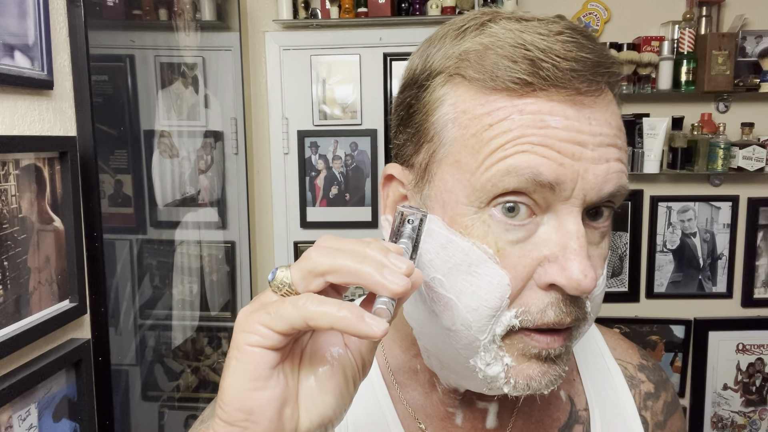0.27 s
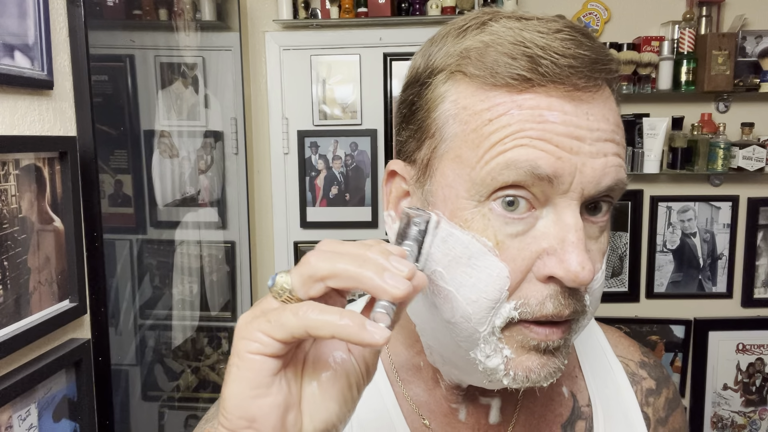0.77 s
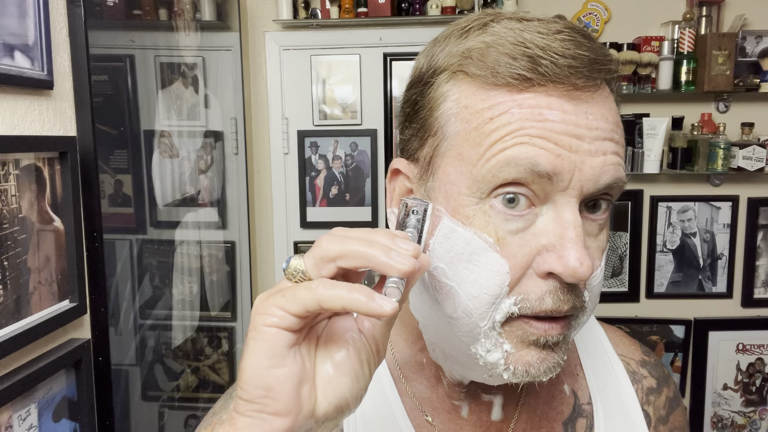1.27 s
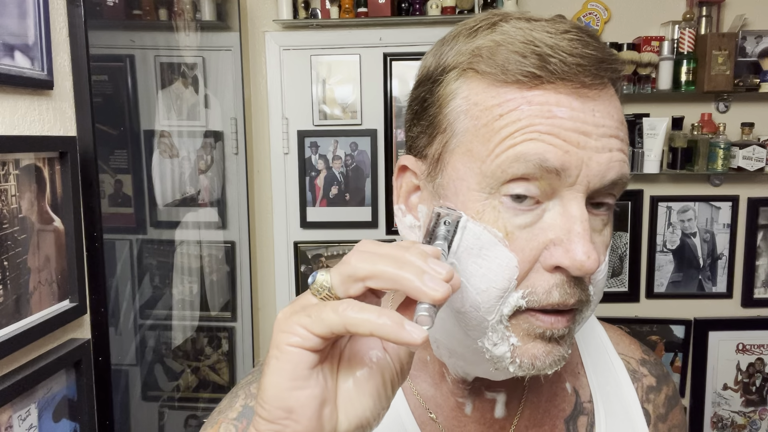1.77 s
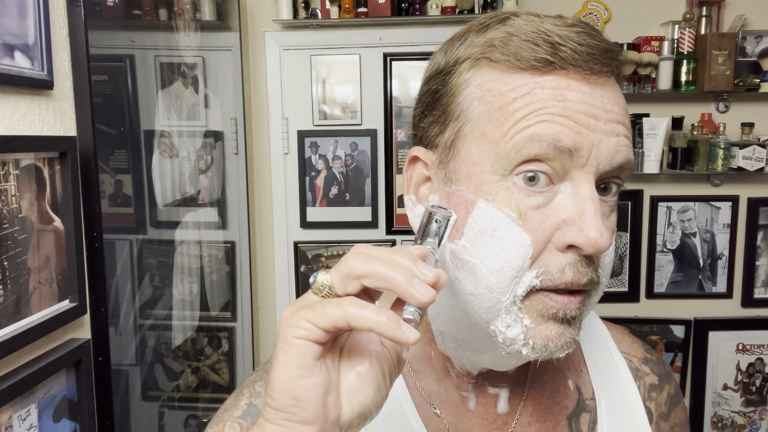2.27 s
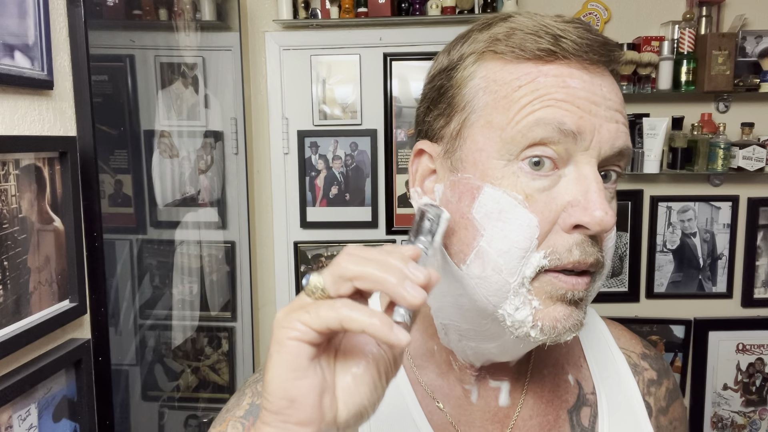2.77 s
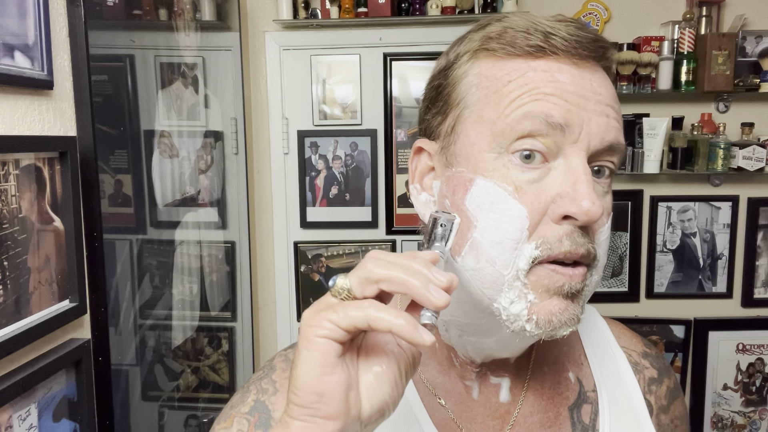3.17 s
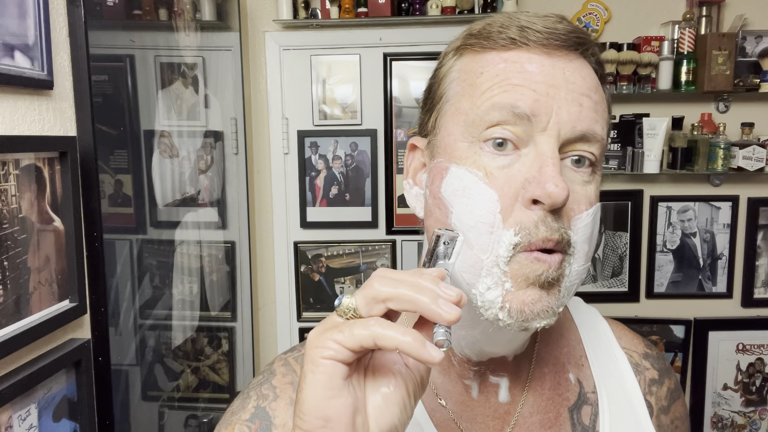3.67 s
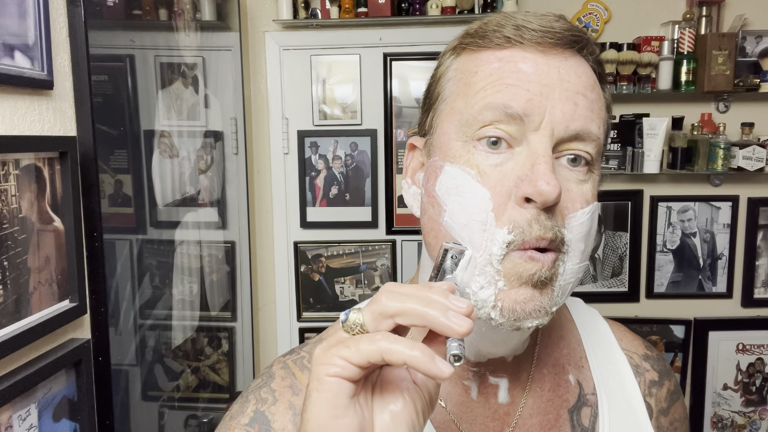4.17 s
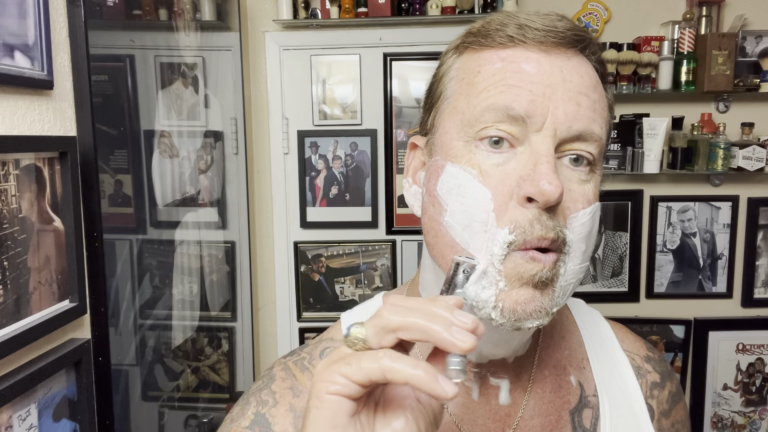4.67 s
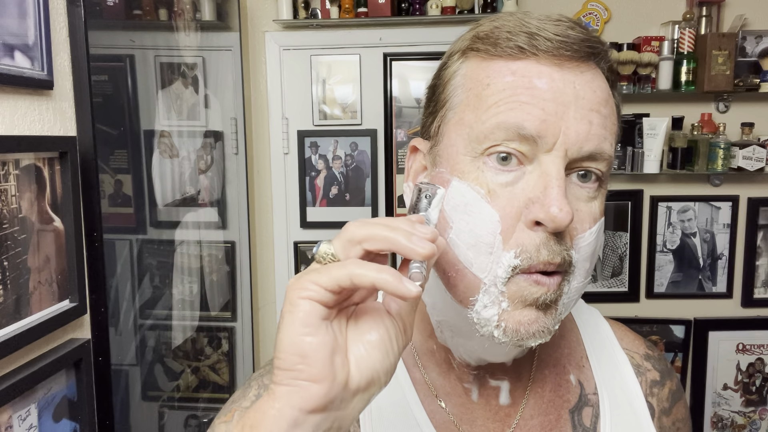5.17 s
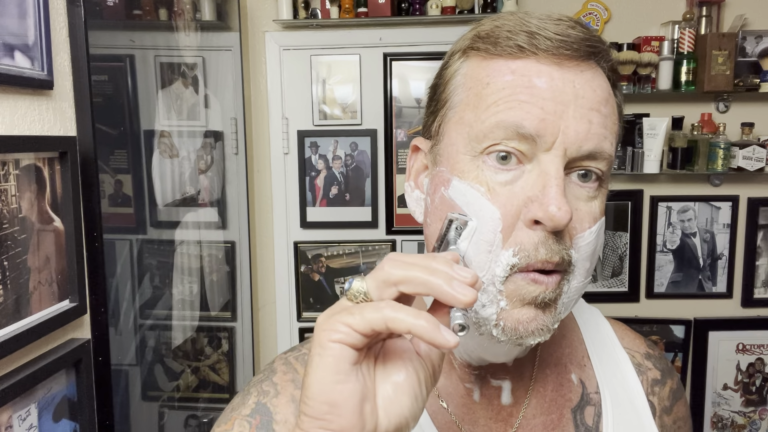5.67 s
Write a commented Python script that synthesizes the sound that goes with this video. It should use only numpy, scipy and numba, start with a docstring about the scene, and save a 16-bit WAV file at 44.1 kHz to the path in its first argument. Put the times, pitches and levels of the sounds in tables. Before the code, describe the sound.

A safety razor shaves lathered stubble, close to a phone in a small, fairly dry room. The rasp is a fine crowd of bright metallic clicks, broken by sharper irregular whisker snaps. The first stroke, 0.2 to 0.7 s, starts lightly and crackles harder at its end. The second, 1.25 to 1.85 s, is similar, with very faint squeaks and a soft rub after it. The third, 2.05 to 2.7 s, builds to a firm scrape and ends with a dull little knock. The fourth, 3.0 to 4.7 s, is longest and strongest, its tone sinking from crisp to hollower and lower. After a gap, a lighter, duller stroke runs 5.13 to 5.9 s. Between strokes only the background remains: a low throbbing fan motor, mains hum and bassy air rumble, strongest at first, when a faint low drone glides and fades by about 1.6 s.

```python
"""Five crisp, rasping strokes of a safety razor down a lathered cheek, heard close to a phone in a small room.
The rasp is a crowd of tiny clicks, one per cut whisker, ringing the blade and then the cheek.
It deepens towards the mouth as the lowest cheek resonance falls; rubs, squeaks and knocks are filtered noise and tones.
Underneath lie a throbbing fan motor and mains hum made of sines, a rumble of shaped noise,
and, at first, a faint drone of gliding low tones."""
import sys
import numpy as np
from scipy import signal
from scipy.fft import rfft, irfft
from scipy.io import wavfile
from scipy.ndimage import uniform_filter1d
from numba import njit

SR = 44100
rng = np.random.default_rng(int(sys.argv[2]) if len(sys.argv) > 2 else 0)


def generate_wav(sig):
    """Save sig (samples, or channels by samples) to the path in sys.argv[1] as 16-bit PCM at SR."""
    pcm = np.round(np.clip(np.atleast_2d(sig).T, -1, 1) * 32767).astype(np.int16)
    wavfile.write(sys.argv[1], SR, pcm)


N = 261072
TIME = np.arange(N) / SR
FREQ = np.fft.rfftfreq(N, 1 / SR)

# Levels in the tables are those of the source, ahead of any trim, swell or room in the functions.

# The strokes of the razor. Each row: touch in seconds, start of the lift in seconds,
# time to settle on the skin in seconds, level at the start in dB, level at the end in dB.
STROKES = [(0.16, 0.728, 0.19, -68.5, -71), (1.247, 1.84, 0.041, -71, -70),
           (2.043, 2.686, 0.21, -67.5, -56.5), (3.002, 4.711, 0.035, -54.5, -62.5),
           (5.127, 5.92, 0.038, -66, -63.5)]
# The hand pushes or eases within a stroke. Each row: middle in seconds, length in seconds, change of level in dB.
PUSHES = [(0.557, 0.066, 7), (0.714, 0.12, 17), (1.393, 0.039, 6), (1.48, 0.056, 2), (1.6, 0.13, 11),
          (2.313, 0.093, 6.5), (2.482, 0.12, 7.5), (2.595, 0.097, 12), (3.129, 0.091, 7.5),
          (3.519, 0.3, 8.5), (3.768, 0.027, -6), (4.022, 0.2, 3), (4.182, 0.022, -9), (4.404, 0.064, 5),
          (4.631, 0.13, 6.5), (5.256, 0.067, 6.5)]
# The coarsest whiskers. Each row: time of the snap in seconds, level in dB.
SNAPS = [(0.278, -51.5), (0.3403, -41.5), (.391, -44), (.396, -45.5), (.406, -56), (.490, -53),
         (0.5103, -46), (.519, -50), (.527, -45.5), (0.549, -54), (0.588, -51), (.605, -47), (.615, -55),
         (0.626, -43.5), (0.636, -44.5), (0.6691, -40), (.699, -47), (0.7154, -35.5), (1.298, -54),
         (1.333, -46), (1.3615, -44), (1.385, -51), (1.399, -49), (1.416, -43), (1.4288, -44.5),
         (1.5194, -45), (1.533, -48.5), (1.5618, -39), (1.571, -46), (1.612, -49), (1.619, -46.5),
         (1.646, -52), (1.6671, -40), (1.6852, -39.5), (1.724, -45.5), (1.7693, -41), (1.811, -53),
         (1.837, -55), (1.883, -67), (2.174, -68), (2.202, -68), (2.217, -53), (2.245, -48.5), (2.258, -60),
         (2.272, -52), (2.318, -41.5), (2.328, -38.5), (2.369, -39.5), (2.384, -47), (2.4204, -39),
         (2.443, -44), (2.468, -37.5), (2.48, -36.5), (2.491, -40), (2.509, -39), (2.546, -38.5),
         (2.565, -36.5), (2.578, -39), (2.63, -35.5), (2.6816, -44.5), (3.0412, -48), (3.049, -44),
         (3.078, -45), (3.122, -39), (3.151, -38.5), (3.1843, -37), (3.2105, -46), (3.258, -36),
         (3.3252, -39), (3.338, -37), (3.435, -39), (3.462, -37), (3.471, -36), (3.512, -38.5),
         (3.627, -37.5), (3.6515, -39), (3.682, -39), (3.713, -37.5), (3.73, -44), (3.757, -45),
         (3.783, -37), (3.796, -39), (3.808, -45), (3.8301, -37), (3.922, -35), (3.955, -38.5),
         (4.019, -39.5), (4.0416, -38), (4.095, -44.5), (4.111, -43.5), (4.153, -46.5), (4.193, -41),
         (4.213, -50), (4.2477, -39), (4.295, -43.5), (4.3208, -40), (4.376, -46), (4.4069, -46),
         (4.481, -46), (4.528, -44), (4.556, -50), (4.6108, -43), (4.624, -42), (4.693, -38), (5.041, -63),
         (5.155, -56), (5.174, -53), (5.182, -48), (5.232, -44), (5.3, -49), (5.344, -52.5), (5.372, -47.5),
         (5.401, -48), (5.4293, -50.5), (5.438, -46.5), (5.459, -49.5), (5.479, -45), (5.51, -42.5),
         (5.543, -48), (5.592, -45.5), (5.604, -46), (5.642, -45.5), (5.668, -48), (5.693, -49.5),
         (5.713, -48.5), (5.764, -49.5), (5.784, -48), (5.821, -49.5), (5.848, -50.5), (5.855, -46.5),
         (5.89, -56)]
# Ring of the razor head. Each row: frequency in Hz, relative level in dB.
BLADE = [(900, -23.5), (1600, -7.5), (2300, -4), (2950, -9.5), (3500, -6), (3950, -8), (4450, -6.5),
         (5100, -5.5), (5900, -3.5), (7000, 1), (8800, 5), (10500, 6), (12200, -1.5), (14000, -0.5),
         (15500, -7.5)]
# The cheek under the blade, from temple towards mouth. Each row: time in seconds, lowest resonance in Hz,
# strength of that resonance in dB.
CHEEK = [(.3, 5380, -8.5), (1.3, 5310, -6), (2.25, 4450, -9.5), (2.6, 3830, -7.5), (3.1, 3750, -5),
         (3.55, 3480, 3), (3.8, 3260, 2.5), (4.0, 3080, 5), (4.12, 2460, -2.5), (4.7, 2300, -8),
         (5.17, 2300, -20), (5.3, 2070, -9), (5.9, 1980, -2)]
# Upper resonances of the cheek. Each row: frequency in Hz, width in Hz, relative level in dB.
UPPER = [(4250, 310, 3), (5300, 520, -2.5), (5870, 510, 3)]
# Soft rubs and squishes of skin and lather. Each row: start in seconds, end in seconds, frequency in Hz,
# width in Hz, level in dB.
RUBS = [(1.78, 1.924, 394.6, 75, -64), (1.794, 1.888, 650, 200, -86.5), (1.952, 2.024, 365, 60, -65.5),
        (2.302, 2.673, 1660, 1210, -84.5), (2.525, 2.626, 352, 90, -67), (1.428, 1.475, 1090, 200, -77),
        (3.88, 4.04, 600, 500, -82)]
# Faint squeaks. Each row: start in seconds, end in seconds, first pitch in Hz, last pitch in Hz, level in dB.
SQUEAKS = [(1.374, 1.461, 1510, 1602, -82.5), (1.426, 1.51, 1200, 1180, -79),
           (1.473, 1.52, 1630, 1520, -85.5), (2.882, 2.95, 3700, 3700, -84)]
# Dull knocks of the razor in the hand. Each row: time in seconds, frequency in Hz, width in Hz,
# decay in seconds, level in dB.
KNOCKS = [(2.68, 600, 1100, 0.025, -69), (3.837, 720, 1090, 0.021, -66), (5.461, 700, 1000, 0.031, -72)]
# The razor at the two ports. Each row: frequency in Hz, lead of the left in ms, left minus right in dB,
# scattered sound in dB.
PORTS = [(450, 0.043, -10.5, -4.5), (1000, 0.047, -0.5, 9), (2440, 0.18, -2.5, 5.5),
         (3500, 0.0014, -2.5, 9.5), (4550, 0.2, -9.5, 2.5), (5830, 0.2, -4.5, 2.5),
         (8250, 0.1848, -3, -1.5), (11300, 0.17, 0.5, 5.5), (12600, 0.175, 2.5, 4.5),
         (13100, 0.162, -1.5, -11.5)]
# Fan motor lines. Each row: frequency in Hz, level in dB.
HUM = [(46.7, -61.5), (55.9, -57), (65.2, -59), (111.8, -64.5), (167.7, -66), (223.6, -86), (335.4, -79.5),
       (383, -80.5), (466, -100.5)]
# The fan hum swells and sinks. Each row: time in seconds, change of level in dB.
HUM_SWELL = [(0, 3), (1.2, 3.5), (2.2, 2.5), (2.9, 1.5), (3.25, -3.5), (3.6, 3), (4.3, 4), (4.8, -0.5),
             (5.3, 2.5), (5.9, 2.5)]
# Tones of the faint drone. Each row: start in seconds, end in seconds, first pitch in Hz, last pitch in Hz,
# level in dB.
DRONE = [(-1.37, 0.37, 124.5, 110, -49), (.33, 0.803, 118, 93, -53.5), (0.706, 1.21, 119, 113, -55.5),
         (1.12, 1.6, 121, 116, -59.5), (-0.054, 0.375, 280, 210, -61.5), (.4, 0.734, 150, 231, -62.5),
         (.12, .45, 120, 200, -63), (0.313, 0.67, 160, 180, -66), (0.78, 1.5, 220, 150, -64.5)]
# Moving air in the room. Each row: frequency in Hz, level in dB per Hz.
AIR = [(20, -92), (30, -82), (38, -77.5), (75, -75), (95, -74), (112, -73.5), (140, -77), (200, -77.5),
       (255, -84.5), (290, -88.5), (385, -88.5), (440, -99), (1000, -109), (4000, -121), (8000, -126),
       (11000, -121.5), (15000, -134)]
# Likeness of the air at the two ports. Each row: frequency in Hz, correlation from -1 to 1.
AIR_LIKENESS = [(60, 0.72), (130, 0.96), (220, 0.48), (400, -0.75), (1000, -0.5)]
# Balance of the air. Each row: frequency in Hz, left minus right in dB.
AIR_BALANCE = [(200, 0), (380, -5.5), (1000, -0.5), (4400, -2), (11000, 0)]

TOUCH_DB, LIFT_DB_PER_S = -31.5, 447  # first touch against the settled stroke; fade as the blade lifts
SNAG_DB, SNAG_S = -4.5, 0.0076  # the rasp stalls by this much, for about this long, before a coarse whisker gives
FIRM_HZ, SOFT_HZ = 3530, 2420  # lowest resonance of the cheek over bone and where it is slack
CHEEK_DAMPING = .2
FIRM_SPLINTER, SLACK_SPLINTER = .45, .75  # share of a snap's energy in splinters, over bone and on slack skin
SPLINTER_S = .0015  # decay of the splinters
MAINS_HZ, MAINS_DB, MAINS_OCTAVE_DB = 120, -61, -16.5  # hum, its level, and its octave against that level
RUMBLE_DB, GUST_DB, GUST_S = -3, 3, 0.42  # settled rumble trim; extra at the start; time constant of its fading
TOP_HZ = 15600


def razor(level_db):
    """Whisker clicks, thinned while the blade snags, ring the razor head and then the cheek."""
    held_db = level_db + snag()
    clicks = ring(stubble(held_db) + snaps(held_db), BLADE)
    return cheek(clicks)


def cheek(clicks, order=4, edge_damping=1.0, skirt=0.79, wander=0.05, wander_hz=45, leak_db=-18,
          firm_upper_db=-14, soft_upper_db=3.0):
    """The cheek adds resonances and radiates mainly above the lowest, which shifts as skin stretches and slips."""
    edge_hz, peak_db = curve(CHEEK, axis=1), curve(CHEEK, axis=2)
    upper_db = np.interp(edge_hz, [SOFT_HZ, FIRM_HZ], [soft_upper_db, firm_upper_db])
    radiated = clicks
    for _ in range(order):
        _, radiated = svf(radiated, skirt * edge_hz, edge_damping)
    moving_hz = edge_hz * np.exp(wander * walk(wander_hz))
    lowest, _ = svf(radiated, moving_hz, CHEEK_DAMPING)
    upper = np.zeros(N)
    for hz, width, db in UPPER:
        band, _ = svf(radiated, np.full(N, float(hz)), width / hz)
        upper += undb(db) * band
    sound = radiated + undb(peak_db) * lowest + undb(upper_db) * upper + undb(leak_db) * clicks
    return dull(sound, edge_hz, peak_db)


def dull(sound, edge_hz, peak_db, split_hz=7600, firm_bright_db=-0.9, soft_bright_db=-8.0, dulling=0.27):
    """Soft or strongly ringing skin tilts the balance from the treble to the body of the sound."""
    bright_db = np.interp(edge_hz, [SOFT_HZ, FIRM_HZ], [soft_bright_db, firm_bright_db]) - dulling * peak_db
    body = irfft(rfft(sound) / (1 + (FREQ / split_hz) ** 10), N)
    treble = sound - body
    return body * undb(-bright_db / 2) + treble * undb(bright_db / 2)


def pressure():
    """Level of the rasp in dB: each stroke settles, ramps and lifts off; the hand pushes or eases within it."""
    strokes = []
    for start, end, settle, first_db, last_db in STROKES:
        ramp = np.interp(TIME, [start, end], [first_db, last_db])
        landing = np.minimum((TIME - start) / settle - 1, 0) * -TOUCH_DB
        lifting = np.maximum(TIME - end, 0) * LIFT_DB_PER_S
        strokes.append(ramp + landing - lifting)
    pushes = sum(db * np.exp(-(2 * (TIME - s) / length) ** 2) for s, length, db in PUSHES)
    return np.max(strokes, axis=0) + pushes


def stubble(level_db, rate=2100, rate_db=-55, crowding=0.45, spread_db=10.0, catch_db=4.0, catch_hz=200,
            lather_db=-11):
    """Clicks of cut hairs, denser in a firm stroke and bunched as the blade catches, over a fine hiss of lather."""
    # rate is in hairs per second at a level of rate_db
    density = np.clip(rate / SR * undb(crowding * (level_db - rate_db)), .015, 1)
    cut = (rng.random(N) < density) / np.sqrt(density)
    size = unit(undb(spread_db * np.clip(rng.standard_normal(N), -2, 2)))
    hairs = cut * size * rng.choice([-1, 1], N)
    lather = undb(lather_db) * rng.standard_normal(N)
    return catching(catch_hz, catch_db) * (hairs + lather) * undb(level_db)


def catching(rate_hz, depth_db, even_s=0.043):
    """The blade catches and slips in quick jolts; the steady hand keeps their average force even."""
    jolts = undb(depth_db * np.clip(walk(rate_hz), -2, 2))
    return jolts / np.sqrt(uniform_filter1d(jolts ** 2, int(even_s * SR)))


def snaps(level_db, coarse_db=2.0, contact_s=0.00043):
    """A whisker parts with one sharp click and a few splinters, which take more energy where the skin is slack."""
    out, t = np.zeros(N + SR), TIME[:SR // 100]
    crackle = rng.standard_normal(N + SR) * (rng.random(N + SR) < .3)
    share = np.interp(curve(CHEEK, axis=1), [SOFT_HZ, FIRM_HZ], [SLACK_SPLINTER, FIRM_SPLINTER])
    coarse = [(s, db + coarse_db) for s, db in SNAPS]
    for s, db in coarse + lesser_snaps(level_db):
        start = int(s * SR)
        splinters = unit(crackle[start:start + len(t)] * np.exp(-t / SPLINTER_S))
        burst = splinters * np.sqrt(share[start] / len(t))
        burst[0] = np.sqrt(1 - share[start])  # the sharp click
        out[start:start + len(t)] += burst * undb(db) * np.sqrt(contact_s * SR)
    return out[:N]


def lesser_snaps(level_db, count=560, typical_db=-55.0, at_db=-60, follow=1.0, spread_db=6.0, contact_db=-68,
                 fade=0.17):
    """Times and levels of middling whiskers, met at random: louder under pressure, fading where the blade lightens."""
    chance = rng.random((count, 2))
    at = ((np.arange(count) + chance[:, 0]) / count * N).astype(int)
    light = fade * np.minimum(level_db[at] - contact_db, 0)  # extra fall where the blade barely touches
    db = typical_db + follow * (level_db[at] - at_db) + light
    return list(zip(TIME[at], db + spread_db * (2 * chance[:, 1] - 1)))


def snag():
    """Dip of the rasp in dB, deepening while each coarse whisker holds the blade up, until it gives."""
    gives = np.zeros(N)
    gives[[int(s * SR) for s, _ in SNAPS]] = 1
    # a decay run backwards in time grows towards each snap
    held = signal.lfilter([1], [1, -np.exp(-1 / (SNAG_S * SR))], gives[::-1])[::-1]
    return SNAG_DB * held


def drag(level_db, hz=378, width_hz=80, drag_db=-75, at_db=-60, follow=0.41):
    """The skin dragged by the razor adds a dull rub that grows with the pressure."""
    return friction(hz, width_hz) * undb(drag_db + follow * (level_db - at_db))


def rubs(fade_s=0.013):
    """Short, soft spells of friction, each in one resonance."""
    return sum(friction(hz, width) * gate(start, end, fade_s) * undb(db) for start, end, hz, width, db in RUBS)


def squeaks(fade_s=0.019, jitter=.032, jitter_hz=55, flutter_db=3.0):
    """Faint, thin sine squeaks, most sliding in pitch, with jitter and flutter."""
    out = np.zeros(N)
    for start, end, first_hz, last_hz, db in SQUEAKS:
        hz = np.interp(TIME, [start, end], [first_hz, last_hz]) * (1 + jitter * walk(jitter_hz))
        tone = np.sin(2 * np.pi * np.cumsum(hz) / SR)
        fluttering = unit(tone * undb(flutter_db * walk(jitter_hz)))
        out += fluttering * gate(start, end, fade_s) * undb(db)
    return out


def knocks(attack_s=0.00049):
    """Each knock starts almost at once and dies away in one broad resonance."""
    out = np.zeros(N)
    for s, hz, width, decay, db in KNOCKS:
        attack = np.clip((TIME - s) / attack_s, 0, 1)
        out += friction(hz, width) * attack * np.exp(-np.abs(TIME - s) / decay) * undb(db)
    return out


def room(x, bounce_s=.00135, bounce_db=-18, drift_hz=0.547):
    """Each port hears the sound with its own delay, one close bounce and slowly drifting reflections."""
    delay = np.exp(-2j * np.pi * FREQ * shape(PORTS) / 1000)  # ms to s; the right port lags
    direct = 1 + undb(bounce_db) * np.exp(-2j * np.pi * FREQ * bounce_s)
    drift = 2 * np.pi * drift_hz * TIME
    out = []
    for arrival, side in ((1, .5), (delay, -.5)):
        port = undb(side * shape(PORTS, axis=2))
        # two sets of reflections trade places as the hand moves
        reflected = sum(travel(x * share, port * scatter()) for share in (np.cos(drift), np.sin(drift)))
        out.append(travel(x, port * arrival * direct) + reflected)
    return np.array(out)


def scatter(t60=0.2, tail_db=-7, near_db=-13, near_s=0.0038, rise_s=0.0006):
    """Response of one set of reflections: quick ones off face and hand, and the short tail of the room."""
    rise = np.clip(TIME / rise_s, 0, 1)
    tail = unit(rng.standard_normal(N) * np.exp(-np.log(1000) * TIME / t60) * rise)
    near = unit(rng.standard_normal(N) * np.exp(-TIME / near_s) * rise)
    return rfft(undb(tail_db) * tail + undb(near_db) * near) / np.sqrt(N) * undb(shape(PORTS, axis=3))


def fan(waver=0.2, waver_hz=2.37, swell_db=1.5, hum_db=-1.5):
    """Motor lines with sidebands a shaft turn apart, which make the hum throb; each wavers a little."""
    out = np.zeros(N)
    for hz, db in HUM:
        phase = 2 * np.pi * (hz * TIME + rng.random()) + waver * walk(waver_hz)  # waver in radians
        out += np.sqrt(2) * np.sin(phase) * undb(db + swell_db * walk(waver_hz))
    return out * undb(hum_db + curve(HUM_SWELL))


def mains(waver=0.5, waver_hz=1.0, swell_db=1.5):
    """Electric hum and its octave, wavering together in phase and level."""
    phase = 2 * np.pi * MAINS_HZ * TIME + waver * walk(waver_hz)
    tone = np.sqrt(2) * (np.sin(phase) + undb(MAINS_OCTAVE_DB) * np.sin(2 * phase))
    return tone * undb(MAINS_DB + swell_db * walk(waver_hz))


def drone(fade_s=0.13):
    """Overlapping low sines that glide, some sagging and some rising, each faded at its ends."""
    out = np.zeros(N)
    for start, end, first_hz, last_hz, db in DRONE:
        hz = np.interp(TIME, [start, end], [first_hz, last_hz])
        phase = 2 * np.pi * (np.cumsum(hz) / SR + rng.random())
        out += np.sqrt(2) * np.sin(phase) * undb(db) * gate(start, end, fade_s)
    return out


def air(swell_db=0.48):
    """Moving air as shaped noise: a swelling bass rumble and a steady hiss, sharing a set likeness between ports."""
    likeness = np.clip(shape(AIR_LIKENESS), -1, 1)
    mid, side = rfft(rng.standard_normal((2, N)))
    sides = np.array([[1], [-1]])
    pair = mid * np.sqrt((1 + likeness) / 2) + sides * side * np.sqrt((1 - likeness) / 2)
    pair = pair * undb(shape(AIR) + sides * shape(AIR_BALANCE) / 2) * np.sqrt(SR / 2)
    bass = 1 / (1 + (FREQ / 500) ** 4)
    swell = undb(swell_db * walk(0.91) + RUMBLE_DB + GUST_DB * np.exp(-TIME / GUST_S))
    return irfft(pair * bass, N) * swell + irfft(pair * (1 - bass), N)


def friction(hz, width_hz):
    """Rubbing noise in one resonance, rms 1."""
    return unit(irfft(rfft(rng.standard_normal(N)) / (1 + (2 * (FREQ - hz) / width_hz) ** 2), N))


def ring(x, rows):
    """Causal (minimum-phase) resonance with the given spectrum; keeps the energy of a click."""
    cepstrum = irfft(np.log(unit(undb(shape(rows)))), N)
    cepstrum[1:N // 2] *= 2
    cepstrum[N // 2 + 1:] = 0
    return irfft(rfft(x) * np.exp(rfft(cepstrum)), N)


@njit
def svf(x, hz, damping):
    """State-variable filter with a moving centre: band-pass (gain 1) and high-pass."""
    band, high, b, l = np.empty(len(x)), np.empty(len(x)), 0., 0.
    for i in range(len(x)):
        g = np.tan(np.pi * hz[i] / SR)
        v = (b + g * (x[i] - l)) / (1 + g * (g + damping))
        low = l + g * v
        band[i], high[i] = damping * v, x[i] - damping * v - low
        b, l = 2 * v - b, 2 * low - l
    return band, high


def travel(x, response):
    """Send a sound along a path with the given frequency response, kept to half a second."""
    return signal.fftconvolve(x, irfft(response, N)[:SR // 2])[:N]


def gate(start, end, fade_s):
    """Envelope that rises, holds and falls between two times."""
    return np.clip(np.minimum(TIME - start, end - TIME) / fade_s, 0, 1)


def walk(rate):
    """Smooth random motion up to about the given rate in Hz, with spread 1."""
    return unit(irfft(rfft(rng.standard_normal(N)) / (1 + (FREQ / rate) ** 4), N))


def curve(rows, axis=1):
    """One column of a time table at every sample."""
    rows = np.asarray(rows)
    return np.interp(TIME, rows[:, 0], rows[:, axis])


def shape(rows, axis=1):
    """One column of a frequency table at every bin, drawn over log frequency."""
    rows = np.asarray(rows)
    return np.interp(np.log(FREQ + 1), np.log(rows[:, 0]), rows[:, axis])


def undb(db):
    """Decibels to gain."""
    return 10 ** (np.asarray(db) / 20)


def unit(x):
    """Scale to rms 1."""
    return x / np.sqrt(np.mean(x ** 2) + 1e-30)


def scene(razor_db=-4.5):
    """Shaving close by, over the fan, hum, drone and air."""
    level_db = pressure()
    rasp = undb(razor_db) * razor(level_db)
    shaving = rasp + drag(level_db) + rubs() + squeaks() + knocks()
    background = fan() + mains() + drone() + air()
    return room(shaving) + background


def record(dry):
    """The phone cuts the top with a steep low-pass."""
    return signal.sosfilt(signal.ellip(8, .2, 70, TOP_HZ, fs=SR, output="sos"), dry)


dry = scene()
out = record(dry)
generate_wav(out)
```